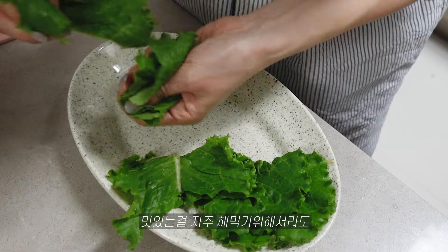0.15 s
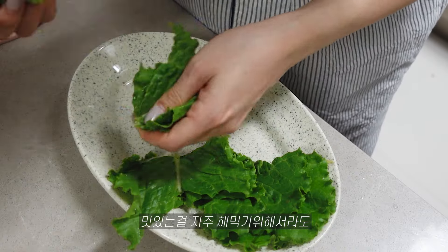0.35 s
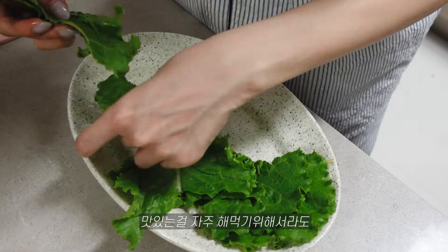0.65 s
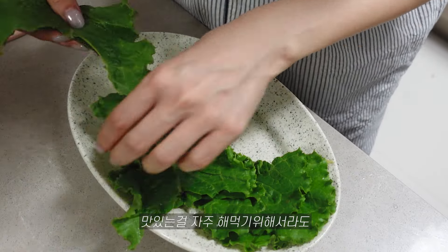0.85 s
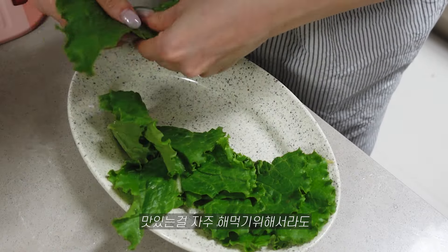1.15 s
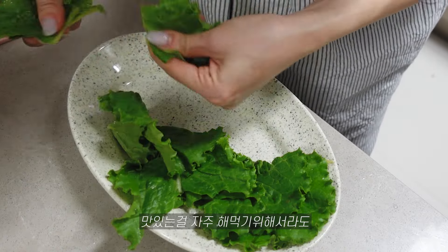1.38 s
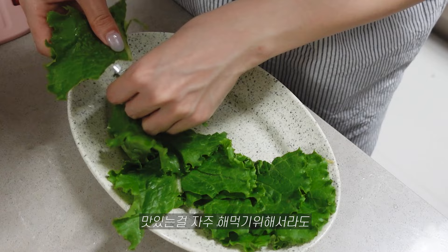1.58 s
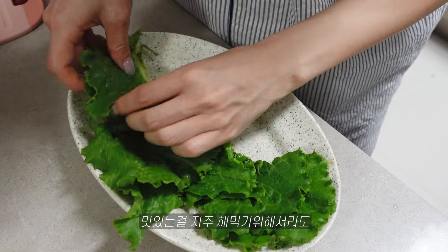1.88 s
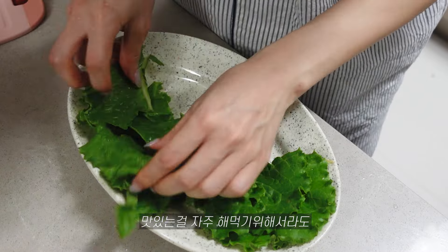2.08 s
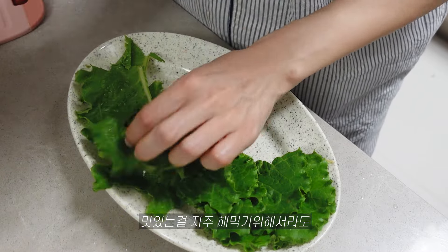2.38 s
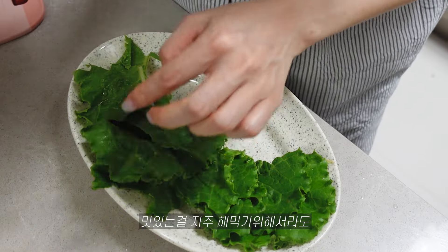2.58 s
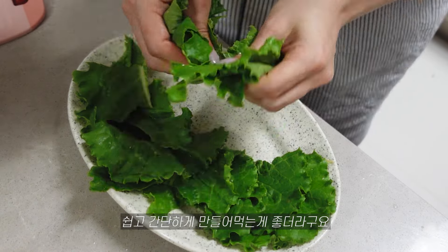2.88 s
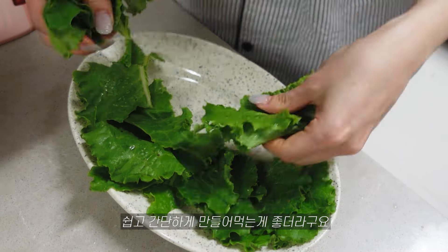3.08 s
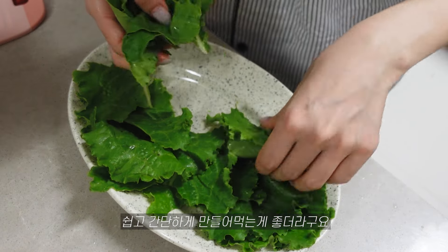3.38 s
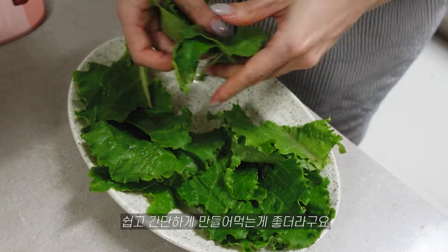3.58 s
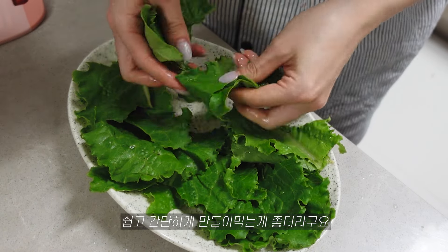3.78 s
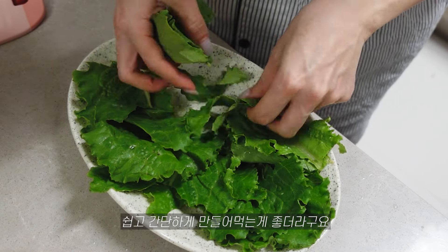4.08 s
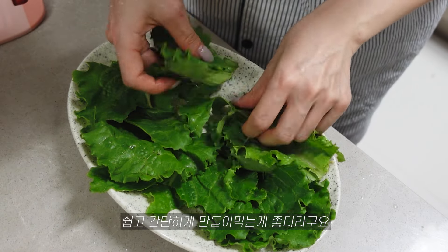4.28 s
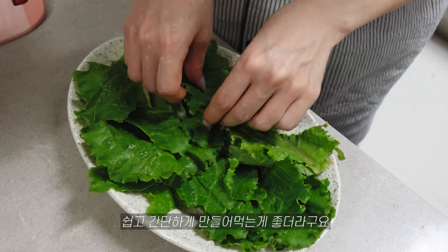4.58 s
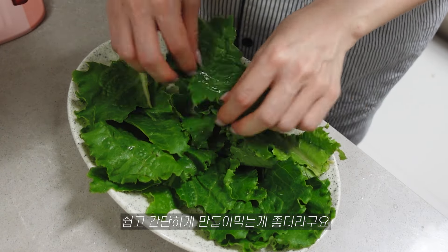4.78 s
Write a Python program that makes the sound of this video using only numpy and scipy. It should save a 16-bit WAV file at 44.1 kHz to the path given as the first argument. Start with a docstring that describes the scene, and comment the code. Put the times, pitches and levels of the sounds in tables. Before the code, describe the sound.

Very close stereo view of hands tearing fresh lettuce in a kitchen. A dense cluster of crisp, dry snaps comes first, ending in a duller knock, then faint rustles and a tiny plate tick. A shorter, brighter crack burst follows, then a lighter one after quiet handling. The rest is soft leaf brushing and small wet ticks over constant hiss and appliance hum, with a short room reflection.

```python
"""Fresh lettuce is torn by hand over a ceramic plate, close to a camera in a kitchen.
Ribs snap in quick clusters, wet leaves rustle as they are laid out, a nail ticks the plate;
an appliance hums, a hiss lies under all, and the tiled room answers each snap."""
import sys
import numpy as np
from scipy import signal
from scipy.fft import rfft, irfft, next_fast_len
from scipy.io import wavfile
from scipy.ndimage import uniform_filter1d, map_coordinates

SR = 44100
rng = np.random.default_rng(int(sys.argv[2]) if len(sys.argv) > 2 else 0)


def dump(signal):
    """Clip the signal to [-1, 1] and save it as 16-bit WAV at the path in sys.argv[1]."""
    limited = np.clip(np.atleast_2d(signal).T, -1, 1)
    pcm = np.round(limited * 32767).astype(np.int16)
    wavfile.write(sys.argv[1], SR, pcm)


N = 218118

# breaking ribs and cells: (s, peak dB, ring Hz, body over treble dB, length ms)
SNAPS = [(0.0035, -12.5, 5000, -7, 0.79), (0.0135, -21, 3500, -3, 2.2), (0.024, -29, 6800, -12, 1), (0.0372, -14, 4700, -12, 1),
         (0.0432, -9.5, 6350, -6.5, 1.2), (0.05, -19, 6400, -16, 0.8), (0.053, -24, 4000, -3, 1), (0.0582, -15.5, 5900, -6, 0.97), (0.0599, -22, 13000, -12, 1),
         (0.0733, -11, 7500, -10, 0.9), (0.0736, -14.5, 2820, -4, 1.2), (0.0798, -23, 6200, -3, 1.2), (0.0865, -24, 6200, -4, 1.5),
         (0.0923, -30, 10500, -12, 1), (0.1041, -18, 6500, -10, 1.6),
         (0.1116, -22, 5300, -9, 1.2), (0.1355, -25, 7000, -12, 0.8), (0.1398, -11, 6270, -3, 0.74), (0.1404, -18, 3240, -7, 1), (0.1432, -12.5, 6350, -8.5, 1.8),
         (0.1443, -14, 6400, -8, 1.7), (0.1455, -13.5, 6470, 0, 0.67), (0.1494, -20, 4200, -7, 1.6), (0.1502, -23, 12000, -10, 1), (0.1584, -21, 5000, -2, 1.5),
         (0.1722, -29, 12000, -12, 1), (0.1738, -9.5, 6040, -1, 0.43), (0.1774, -19, 4850, -1, 1.2), (0.1826, -17, 7840, -5, 0.94),
         (0.1847, -25, 11600, -1, 2), (0.1879, -24, 2300, 0, 0.68), (0.195, -11.5, 4740, -9, 1.2),
         (0.2002, -24, 5000, -3, 1), (0.218, -27, 2980, -8, 1.2), (0.381, -33, 9250, -14, 1.4),
         (0.6568, -27, 4400, 3, 0.6), (0.999, -27.5, 9100, -8, 0.8), (1.1518, -23, 9800, -3, 0.54),
         (1.3419, -11, 12000, -7, 0.93), (1.3417, -9, 9250, -11.5, 1.3), (1.3432, -19, 7200, -8, 1.2), (1.3475, -12.5, 2840, -9, 0.9),
         (1.3514, -9, 11500, -17, 0.3), (1.352, -15, 7840, -17, 1.5), (1.3546, -24, 11400, -14, 2.4), (1.3586, -18.5, 5300, -10, 1.2), (1.36, -16, 8000, -6, 0.8),
         (1.3611, -14, 15200, -16, 1.0), (1.364, -15, 12500, -2.5, 1.7), (1.3663, -24, 4540, -2, 2.5),
         (1.3697, -12.5, 7000, -9, 0.7), (1.372, -17, 7400, -8, 1), (1.3875, -17.5, 13900, -3, 1.3),
         (1.4212, -33, 13000, -14, 0.8), (1.4875, -29, 8800, -9, 0.7), (1.8814, -29, 9450, -18, 1.1),
         (2.1793, -29, 9300, -14, 0.5), (2.184, -31, 11000, -14, 0.8), 
         (2.456, -27, 5600, -7, 0.7), (2.4615, -29, 4400, -7, 0.7),
         (2.5599, -29, 4600, -13, 0.5), (2.615, -34, 4500, -8, 0.7), (2.642, -34, 4400, -10, 1.5), 
        (2.739, -33, 6000, -10, 0.7), (2.8659, -18.5, 9700, -15, 0.9),
         (2.8704, -28, 9900, -16, 1.5), (2.9198, -14, 11500, -10, 0.7), (2.9201, -21, 3800, -3, 1), (2.9276, -26, 12500, -20, 0.4), (2.929, -17, 12400, -12, 0.7),
         (2.9322, -17, 3400, -10, 1.2), (2.9359, -15, 10500, -6, 1.5), (2.938, -18, 3700, -8, 1.2), (2.9398, -20, 3500, -10, 1.2),
         (2.9418, -18, 11100, -6, 1.5), (2.9445, -14, 3680, -2.5, 0.87), 
         (4.0198, -25, 9600, -13, 0.5),
         (4.027, -33, 4800, -14, 0.8), (4.039, -33, 5000, -14, 0.8),
         (4.1778, -26.5, 9800, -12, 1.2), (4.2743, -21.5, 9600, -23, 0.8), (4.278, -29, 10800, -17, 0.5),
         (4.6432, -27, 9800, -5, 1), (4.662, -33, 7200, -8, 1), (4.6755, -33, 5000, -8, 0.7),
         (4.889, -29, 9600, -18, 0.9), (4.893, -33, 5200, -6, 1)]
RUB = [(700, -58), (1500, -6.5), (2150, -9.5), (2800, -3.5), (3300, -4.5), (5000, -2), (7500, -5), (11000, -8.5), (15000, -54)]  # (Hz, dB per Hz)
FIZZ = [(3000, -60), (5000, -23), (7500, -7), (9300, -1), (12000, -2.5), (15600, -4.5), (15900, -88)]  # (Hz, dB per Hz)
BODY = [(500, -66), (1000, -19), (1400, -3), (1900, -1.5), (3000, 2.5), (5000, 2.5), (9000, -27), (16000, -50)]  # middle of a snap: (Hz, dB per Hz)
CRACK = [(800, -80), (3000, -36), (6000, 0), (9500, 0), (15600, 0), (15900, -26), (17000, -33)]  # its treble: (Hz, dB per Hz)
TICKS = [(0.756, -34)]  # nail on the plate: (s, dB)
PLATE = [(2856, 0, .03), (2950, -5, .04), (4230, -6, .04), (4400, -4, .045), (4586, -3, .05), (6520, -5, .02)]  # (Hz, dB, t60 s), fixed
HISS = [(0, -45), (2.66, -44.5), (2.68, -47), (4.95, -46.5)]  # (s, dB)
AIR = [(500, -56), (1200, -12.5), (2150, -2), (2600, 0.5), (3090, 1.5), (5020, -1.5), (5960, 1.5), (7640, 0), (9270, 5), (11500, 2), (15600, 3), (15900, -90)]  # the hiss: (Hz, dB per Hz)
DRONE = [(15, -65), (25, -25), (70, -34), (131, -10.5), (225, -9), (245, -0.5), (465, -2), (544, -4.5), (647, -6),
         (706, -4.5), (826, -5.5), (1040, -4), (1250, -11), (1600, -8), (2080, -16.5), (3520, -120)]  # the appliance: (Hz, dB per Hz)
HUM = [(199, -72.5), (249, -67.5), (332, -67.5), (399, -68), (706, -69.5)]  # its wavering tones: (Hz, dB)
ALIKE = [(60, 0.47), (180, 0.75), (550, 0.81), (1650, 0.74), (2800, 0.86), (4970, 0.89), (9000, 0.84), (15000, 0.72)]  # of the kitchen: (Hz, left-right likeness)
NEAR = [(1300, 0.95), (2400, 1), (4400, 0.98), (8000, 0.96), (15000, 0.71)]  # of the leaves: (Hz, left-right likeness)
SNAP_SIDE = [(1300, -26), (2400, -38), (4400, -19), (8000, -13), (15000, -17)]  # (Hz, side under mid dB)
LEAN = [(60, 2), (240, 1), (950, -1.5), (3770, -0.5), (15000, -3.5)]  # (Hz, left over right dB)
ROOM = [(1000, 0.27), (2500, 0.29), (4000, 0.12), (12000, 0.08)]  # (Hz, t60 s)
TOP_HZ = 16968  # fixed
# pulls that rip a leaf: (start s, end s, knock of the rib over body dB, left over right dB, small crackle dB)
TEARS = [(0.0, 0.03, -16, -0.5, -30), (0.034, 0.115, -19, 0.5, -35), (0.14, 0.172, -18, 0.5, -35),
         (0.172, 0.189, -10.5, -.4, -30), (0.1901, 0.219, -1.5, -.4, -29), (1.34, 1.392, -13.5, -0.8, -29), (2.916, 2.956, -29, -0.5, -38)]
LONE_KNOCK_DB, LONE_PAN_DB, PAN_SCATTER_DB = -28, -1, 0.2  # snaps outside a tear; scatter of all
CRACKLE_PER_S, CRACKLE_SCATTER_DB, CRACKLE_HZ, CRACKLE_BODY_DB, CRACKLE_MS = 83, 4, 6460, -10, 0.64
# leaves always a little in the hands: (s, rub dB near 4 kHz, fizz dB near 11 kHz)
HANDLING = [(0, -48, -45), (.35, -51, -46), (.85, -53, -47), (1.3, -55, -46), (2.0, -60, -49),
            (2.6, -61, -48.5), (2.9, -52.5, -49), (3.3, -65, -56), (4.0, -55.5, -51), (4.4, -64, -62), (4.95, -55, -51)]
# leaves brushing or springing back: (loudest at s, swell s, fade s, rub dB, fizz dB)
BRUSHES = [(0.002, 0.0051, 0.025, -33.5, -43), (0.05, .04, 0.13, -52, -38), (0.143, .006, 0.079, -39, -36.5),
           (0.19, .04, 0.072, -44, -46), (0.38, .03, 0.11, -55, -45), (0.761, .006, 0.049, -48, -49),
           (0.913, .006, .02, -51, -45), (1.345, .006, 0.076, -38, -31), (1.49, 0.036, .1, -49, -44.5), (1.69, 0.036, 0.099, -51, -54),
           (1.89, .06, .1, -60, -47), (2.18, 0.08, 0.054, -48, -45.5), (2.26, 0.098, 0.037, -46, -47),
           (2.459, .006, 0.04, -44, -49), (2.65, 0.12, 0.045, -46, -44), (2.76, .07, 0.042, -46.5, -47),
           (2.869, 0.0061, 0.042, -46.5, -34), (2.94, .015, 0.049, -37.5, -36.5), (3.15, 0.11, 0.11, -52, -53),
           (3.4, 0.07, 0.15, -49, -50), (3.71, 0.05, .04, -48.5, -45), (4.03, .02, 0.027, -46.5, -41),
           (4.278, .006, .12, -49.5, -44), (4.37, 0.052, 0.029, -53, -52), (4.43, 0.027, .04, -51.5, -55),
           (4.54, .08, .06, -51, -57), (4.66, 0.08, .1, -45, -45), (4.896, .012, 0.035, -45.5, -42)]
EDGE_DB = 12  # under the top, one swell before and one fade after; fixed
BAND = [(0, -68), (3, -67), (4, -61.5), (4.95, -59)]  # wavering band of hiss: (s, dB)
BAND_SHAPE = [(2300, -40), (2900, -4), (3200, 4), (3450, -9), (4200, -40)]  # (Hz, dB per Hz)
# wet leaves touching and peeling apart with a small pitched tick: (s, peak dB, pitch Hz, cycles)
POPS = [(1.221, -32, 6200, 5), (2.2202, -24.5, 5400, 3.9), (2.247, -36, 5800, 5), (2.2655, -41, 3300, 5), (2.471, -37, 5500, 6), (2.655, -37, 2500, 4),
        (2.667, -40, 2500, 4), (2.757, -36, 4800, 6), (3.398, -42, 3300, 6), (3.6264, -41, 3350, 5), (3.6568, -38, 3300, 4), (3.6808, -36, 5520, 3),
        (3.709, -40, 4800, 5), (3.714, -42, 3500, 5), (4.602, -44, 3100, 6), (4.635, -38, 3300, 6), (4.657, -39, 4800, 5),
        (4.6645, -40, 3100, 5), (4.7175, -32, 3700, 2.5)]
TOUCH_PER_S, TOUCH_HZ, TOUCH_OCTAVES, TOUCH_CYCLES, TOUCH_SPIKY_DB, TOUCH_DB = 900, 5360, 0.49, 5, 1.5, -8  # countless fainter ticks; level over the rub
THUD_S, THUD_DB, THUD_MS = 2.668, -63, 1.5  # a faint low thud
SPIKE, MOTTLE_DB = 2, 2  # first crack over the burst; uneven colour of each snap


def amp(db):
    return 10 ** (np.asarray(db) / 20)


def unit(x):
    return x / np.sqrt(np.mean(x ** 2) + 1e-20)


def along(points, hz):
    """(Hz, value) points on a log axis."""
    f, v = np.transpose(points)
    return np.interp(np.log(hz + 1), np.log(f + 1), v)


def curves(rows):
    """One value per sample for each column after the time."""
    s, *cols = np.transpose(rows)
    return [np.interp(np.arange(N) / SR, s, c) for c in cols]


def wobble(rate):
    """A smooth random curve, rate knots a second."""
    return map_coordinates(rng.standard_normal(int(N * rate / SR) + 4), [np.arange(N) * rate / SR])


def filtered(x, response):
    """x times a response of frequency."""
    m = next_fast_len(x.shape[-1] + 4096)
    return irfft(rfft(x, m) * response(np.fft.rfftfreq(m, 1 / SR)), m)[..., :x.shape[-1]]


def spread(pair, spectrum, alike=ALIKE):
    """Two unrelated signals become a coloured, partly alike left and right of rms 1."""
    turn = lambda hz: np.arccos(np.clip(along(alike, hz), -1, 1)) / 2
    mid, side = filtered(pair, lambda hz: amp(along(spectrum, hz)) * [np.cos(turn(hz)), np.sin(turn(hz))])
    lean = lambda hz: amp(np.outer([.5, -.5], along(LEAN, hz)))
    return unit(filtered(np.array([mid + side, mid - side]), lean))


def kitchen():
    """Appliance drone with unsteady tones, the hiss above it, and a narrow band of hiss that wavers."""
    t = np.arange(N) / SR
    tones = sum(amp(db + 2 + 2.4 * wobble(7)) * np.sin(2 * np.pi * (hz * t + 0.2 * wobble(4))) for hz, db in HUM)
    drone = amp(-53.5 + 1.03 * wobble(2.74)) * spread(rng.standard_normal((2, N)), DRONE)
    hiss = amp(curves(HISS)[0]) * spread(rng.standard_normal((2, N)), AIR)
    band = amp(curves(BAND)[0] + 1.3 * wobble(6)) * spread(rng.standard_normal((2, N)), BAND_SHAPE)
    return tones + drone + hiss + band


def grains(rate, spiky_db, ms):
    """Noise chopped into tiny slips: sizes with a long tail, each dying within ms."""
    sizes = amp(spiky_db * np.minimum(rng.exponential(size=N), 3.5)) * (rng.random(N) < rate / SR)
    slips = signal.lfilter([1], [1, -np.exp(-1000 / (ms * SR))], sizes)
    return rng.standard_normal((2, N)) * slips


def rustle():
    """Wet leaves rub and let go: coarse dull slips and a finer bright fizz, swelling with every brush."""
    t = np.arange(N) / SR
    power = amp(curves(HANDLING)) ** 2
    for s, swell, fade, rub_db, fizz_db in BRUSHES:
        under_db = EDGE_DB * np.maximum((s - t) / max(swell, 1e-3), (t - s) / max(fade, 1e-3))
        power += amp(np.array([[rub_db], [fizz_db]]) - under_db) ** 2
    rub = spread(unit(grains(rate=900, spiky_db=1.5, ms=2.5)) + amp(TOUCH_DB) * unit(touches()), RUB, NEAR)
    fizz = spread(grains(rate=4000, spiky_db=3.0, ms=1.0), FIZZ, NEAR)
    return np.sqrt(power[0]) * rub + np.sqrt(power[1]) * fizz


def snaps():
    """Each break is a burst with an abrupt start; the freed flap of leaf rings briefly at one pitch."""
    lead = 128  # fixed
    out, t = np.zeros((2, N + SR)), np.maximum(np.arange(-lead, 1024), 0) / SR
    small = crackle()
    for s, db, ring_hz, body_db, ms in SNAPS + small:
        thump_db, pan_db = tear_at(s)
        pan_db += PAN_SCATTER_DB * rng.standard_normal()
        front = np.exp(-t * 1000 / (.6 * ms))  # fixed
        shape = (1 - np.exp(-t / .0001)) * (front + 0.12 * np.exp(-t / 0.0039))  # the fibres go on fraying
        jolt = rng.standard_normal((2, len(t))) * shape
        jolt[:, lead + 2] += SPIKE * rng.choice([-1, 1])
        z = rfft(jolt)  # a break excites every band alike
        burst = irfft(z / np.sqrt(uniform_filter1d(abs(z) ** 2, size=41, axis=1)), len(t))
        knots_db = MOTTLE_DB * rng.standard_normal(16)  # fixed
        mottle = lambda f: amp(np.interp(f, np.linspace(0, TOP_HZ, len(knots_db)), knots_db) * np.clip(f / 4000, 0, 1) ** 2)
        flap = lambda f: mottle(f) * (1 + 3.0 / (1 + 1j * (f - ring_hz) / 450))
        thump = lambda f: amp(thump_db + 7.5) * f ** 4 / (f ** 4 + 480 ** 4) / (1 + ((f - 920) / 480) ** 4)  # a thick rib also knocks
        body = lambda f: amp(body_db + 3.5) * np.hypot(amp(along(BODY, f)), thump(f))
        mid, side = filtered(burst, lambda f: flap(f) * np.hypot(amp(along(CRACK, f)), body(f)))
        size = amp(db - 0.5) * np.sqrt(np.sum(shape ** 2) / np.sum(mid ** 2))
        # the treble differs a little from port to port
        side = filtered(side, lambda f: amp(along(SNAP_SIDE, f)))
        out[:, round(s * SR) - lead:][:, :len(t)] += size * np.array([mid + side, mid - side]) * amp([[pan_db / 2], [-pan_db / 2]])
    return out[:, :N]


def plate():
    """The glazed plate rings for a moment."""
    out, t = np.zeros(N + SR), np.arange(SR // 8) / SR
    for s, db in TICKS:
        ring = sum(amp(level - 60 * t / t60) * np.sin(2 * np.pi * hz * t) for hz, level, t60 in PLATE)
        out[round(s * SR):][:len(t)] += amp(db) * ring * (1 - np.exp(-t / 0.00054))
    return out[:N] * amp([[-.7], [.7]])


def room(x):
    """Each frequency of the answer dies at its own speed; both ports hear much the same."""
    hz, t, z = signal.stft(rng.standard_normal((2, SR // 2)), SR, nperseg=256)
    mid, side = signal.istft(z * amp(-60 * t / along(ROOM, hz)[:, None]), SR, nperseg=256)[1]
    side = filtered(side, lambda f: amp(along(SNAP_SIDE, f)))
    tail = np.array([mid + side, mid - side]) / np.linalg.norm(mid)
    return signal.fftconvolve(np.pad(x, (120, 0))[None], tail, axes=1)[:, :N]


def crackle():
    """Small cells burst at random moments all through a tear; rows as in SNAPS."""
    rows = []
    for start, end, _, _, db in TEARS:
        when, size, pitch, dull = rng.random((12, 4)).T
        times = start - np.cumsum(np.log(1 - when)) / CRACKLE_PER_S
        rows += [(s, db + CRACKLE_SCATTER_DB * (2 * a - 1), CRACKLE_HZ * 2 ** (2 * b - 1), CRACKLE_BODY_DB + 5 * (2 * c - 1), CRACKLE_MS)
                 for s, a, b, c in zip(times, size, pitch, dull) if s < end]
    return rows


def tear_at(s):
    """Knock dB and left over right dB of the tear under way."""
    return next((row[2:4] for row in TEARS if row[0] <= s <= row[1]), (LONE_KNOCK_DB, LONE_PAN_DB))


def ticks(s, db, hz, cycles):
    """One damped sine per row, losing 1/e in half its cycles."""
    s, db, hz, cycles = np.broadcast_arrays(*[np.asarray(v, float)[:, None] for v in (s, db, hz, cycles)])
    k = np.arange(192)  # fixed
    turns = hz * k / SR
    wave = amp(db) * np.sin(2 * np.pi * turns) * (1 - np.exp(-2 * turns)) * np.exp(-2 * turns / cycles) * 2
    return np.bincount((np.round(s * SR).astype(int) + k).ravel(), wave.ravel(), N + SR)[:N]


def touches():
    """Two unrelated swarms of faint ticks, each of its own pitch and size."""
    count = int(TOUCH_PER_S * N / SR)
    return np.array([ticks(rng.random(count) * N / SR, TOUCH_SPIKY_DB * np.minimum(rng.exponential(size=count), 3.5),
                           np.clip(TOUCH_HZ * 2 ** (TOUCH_OCTAVES * rng.standard_normal(count)), 1500, 12000),
                           np.full(count, TOUCH_CYCLES)) for _ in range(2)])


def thud():
    """One soft low push."""
    t = np.arange(N) / SR
    return amp(THUD_DB) * np.exp(-.5 * ((t - THUD_S) * 1000 / THUD_MS) ** 2)


def scene():
    near = snaps() + plate() + ticks(*np.transpose(POPS)) * amp([[LONE_PAN_DB / 2], [-LONE_PAN_DB / 2]])
    return near + amp(-10.0) * room(near.mean(axis=0)) + rustle() + kitchen() + thud()


def record(dry):
    """The camera keeps nothing above its band limit."""
    return filtered(dry, lambda hz: hz < TOP_HZ)


dry = scene()
out = record(dry)
dump(out)
```